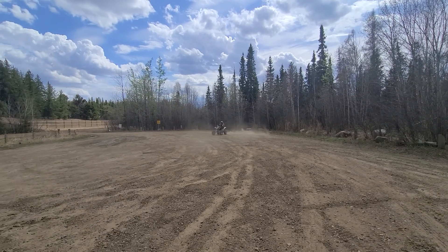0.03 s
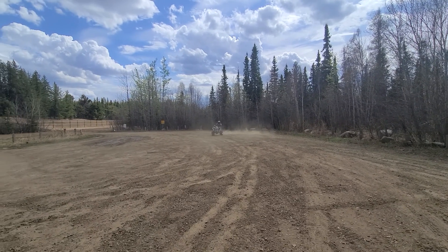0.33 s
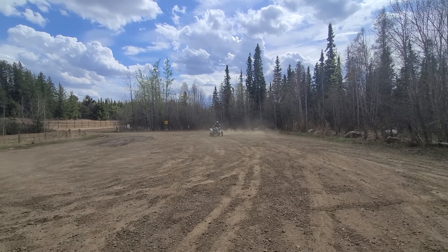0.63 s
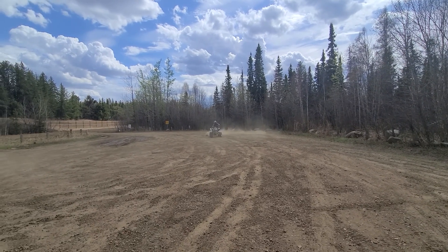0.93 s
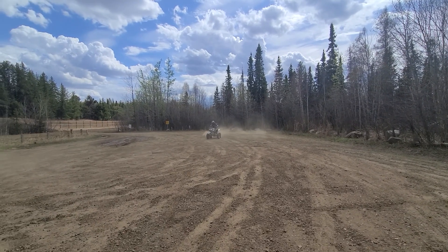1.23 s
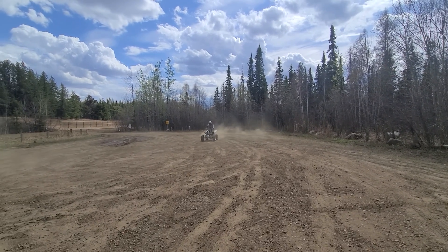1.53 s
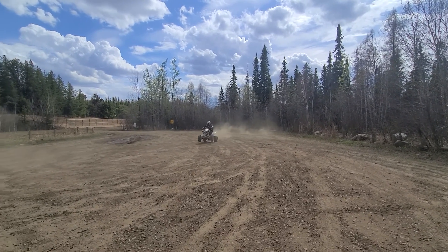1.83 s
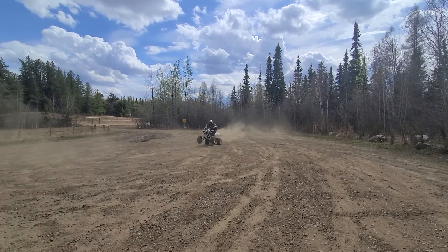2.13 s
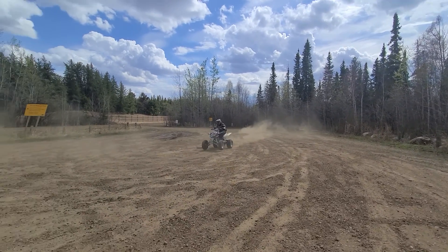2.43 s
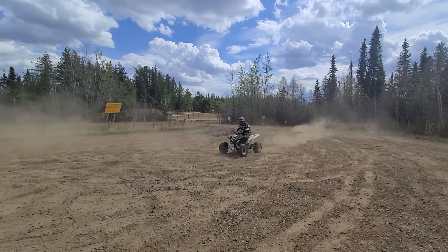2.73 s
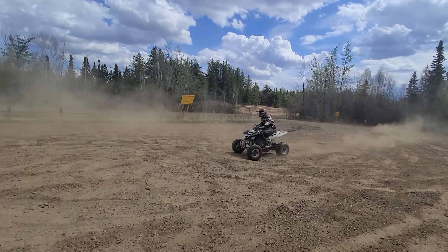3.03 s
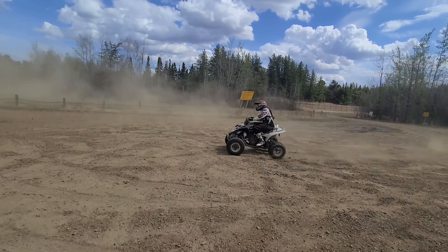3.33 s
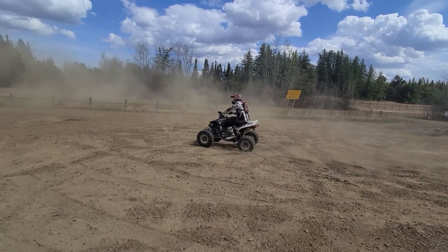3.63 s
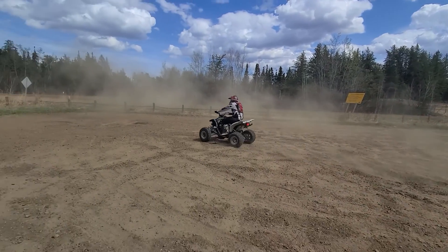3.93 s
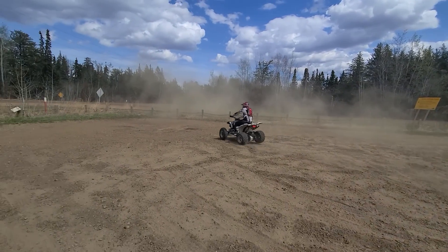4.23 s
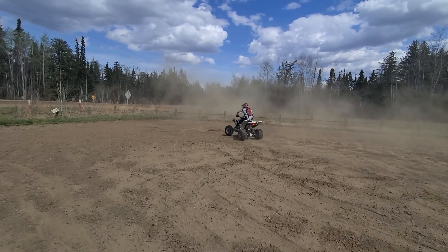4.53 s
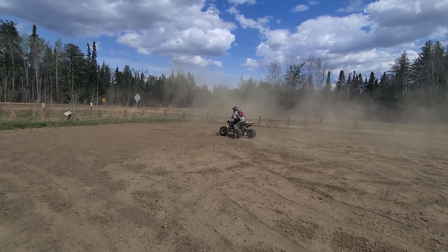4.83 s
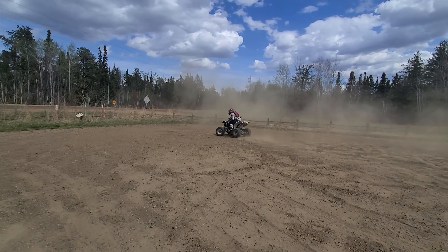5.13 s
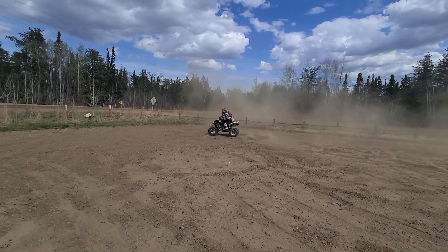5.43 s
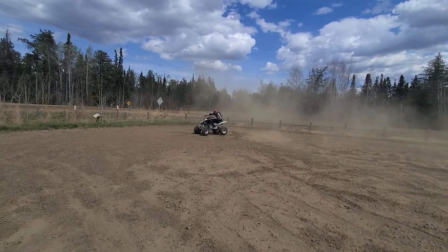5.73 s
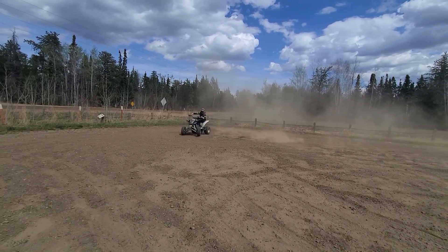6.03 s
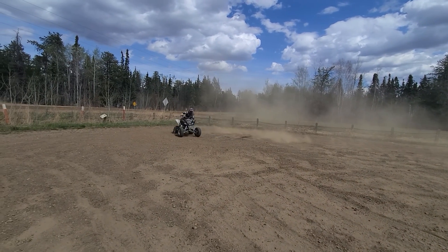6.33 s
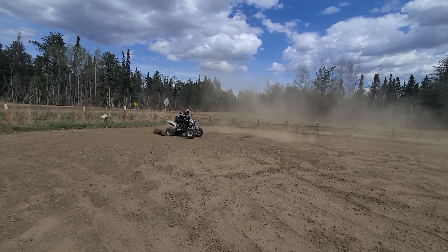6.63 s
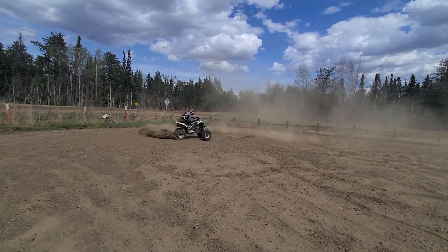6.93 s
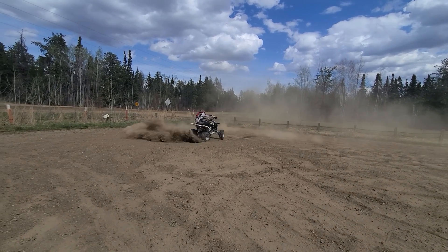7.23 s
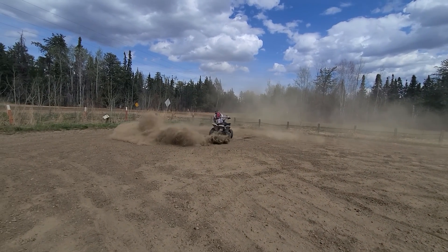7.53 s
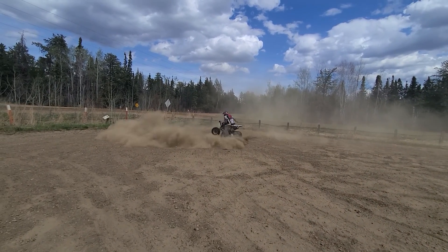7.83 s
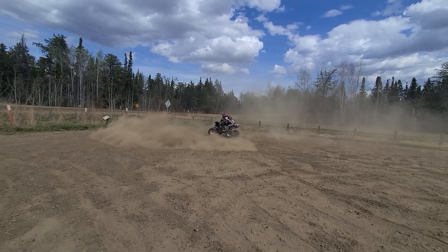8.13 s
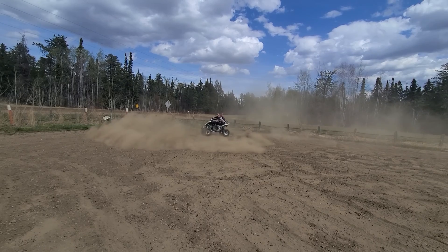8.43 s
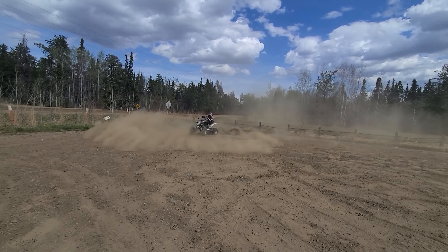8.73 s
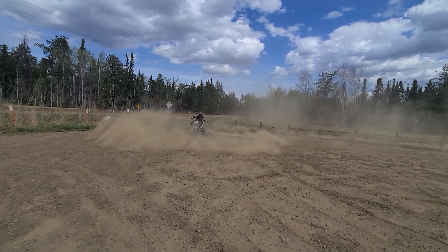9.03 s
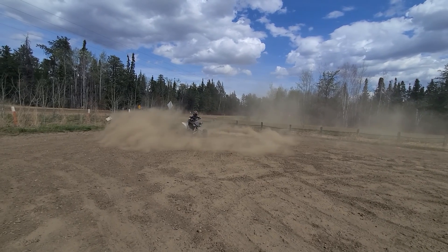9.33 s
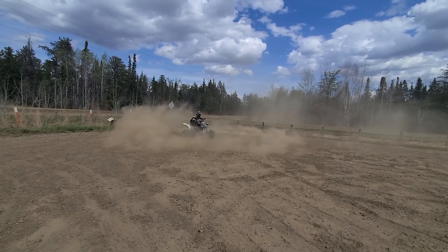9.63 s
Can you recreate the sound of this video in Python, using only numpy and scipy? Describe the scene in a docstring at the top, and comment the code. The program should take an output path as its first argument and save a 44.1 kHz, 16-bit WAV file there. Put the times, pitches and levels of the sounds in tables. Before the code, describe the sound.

Gusts of wind rumble and thud on a microphone with a muffled left side while a quad bike rides over dirt in a forest clearing. The engine gives several short, crackling revs, then sinks to a low putter as it passes with ticking stones, tyre hiss and a thin brake squeal. Rapid throttle blips follow, ending in a longer rising rev, all with a faint, dull echo.

```python
"""On open dirt in a forest, a one-cylinder four-stroke quad bike revs in short bursts (blips),
coasts past at idle and revs again. On throttle each firing thumps, cracks and rasps in the exhaust;
with the throttle shut a later, hollow pulse takes over. Tyres and drive hiss, grit ticks, brakes
squeal faintly and the trees echo. Wind buffets the microphone, whose left side is muffled."""
import sys
import numpy as np
from scipy import signal
from scipy.fft import rfft, irfft
from scipy.io import wavfile
from scipy.ndimage import uniform_filter1d

SR = 44100
rng = np.random.default_rng(int(sys.argv[2]) if len(sys.argv) > 2 else 0)


def store_wav(level_fs):
    """Save 16-bit WAV to argv[1]."""
    pcm = np.round(np.clip(np.atleast_2d(level_fs), -1, 1) * 32767)
    wavfile.write(sys.argv[1], SR, pcm.T.astype(np.int16))


N = 427769
TIME = np.arange(N) / SR
OVERRUN_HZ = 40  # reference firing rate; "overrun" means running on with the throttle shut

# Levels in the tables are relative: the functions add their own gains.
# Tone colours, or how strong each frequency is (f/Hz, level/dB):
WIND_TONE = [(8, -13), (28, -19), (45, -0.5), (90, -7), (200, -18), (600, -69), (4000, -92)]  # wind on the microphone
BUFFET_TONE = [(20, -13), (70, 13), (200, -6), (500, -21), (1200, -47), (4000, -72)]  # a sudden blow of air
MUFFLED_TONE = [(30, -13.5), (65, 1.5), (110, -4.5), (175, -7.5), (260, -8.5), (400, -14.5), (650, -8),
                (1000, -18.5), (1900, -21.5), (3300, -21), (8000, -44.5), (16000, -38)]  # the microphone's left opening
GRIT_TONE = [(500, -15), (1100, 6), (1550, -15), (2700, -6), (6000, -9), (8400, -13), (11000, 0),
             (13500, 3), (16000, -9)]  # stones flung by the tyres
ROLL_TONE = [(500, 4.5), (1100, 9), (1550, -2), (2700, 4), (3900, -0.5), (5200, -2.5), (6000, 1),
             (7300, -5.5), (8400, -17), (10500, -9.5), (12200, -3), (13800, -8.5), (16000, -8.5)]  # tyres and drive
GAS_TONE = [(1200, 1), (2500, 2), (3400, 1), (4600, -1), (6400, 1.5), (7400, -4), (8600, -12.5),
            (10200, -8.5), (11800, -4.5), (13500, -10), (16000, -17.5)]  # gas leaving the pipe
CRACK_TONE = [(350, -15), (570, -10.5), (750, 2.5), (950, -5), (1270, -3), (1550, -20), (2500, -31),
              (5000, -64), (12000, -42)]  # the sharp front of a firing
RING_TONE = [(1000, -40.5), (1600, -12), (1780, 4), (1950, 4.5), (2200, -11), (2700, -10), (4000, -67),
             (12000, -65)]  # the ringing silencer
THUMP_TONE = [(40, -42), (100, -3.5), (170, -3), (290, 3), (410, -1), (540, -13), (750, -31.5),
              (1500, -47.5), (8000, -74.5)]  # a firing on throttle
BARK_TONE = [(150, -28), (330, 2.5), (470, -5), (680, -0.5), (900, -15), (2000, -50), (8000, -80)]  # the hardest firings
HOLLOW_TONE = [(50, -18), (110, 1.5), (160, 5.5), (215, -5), (300, 2), (400, -10.5), (540, -26.5),
               (1000, -35), (8000, -65)]  # the pulse with the throttle shut
IDLE_TONE = [(28, -9), (45, 8), (100, -3), (160, 3), (225, 2), (330, -2), (410, -7.5), (480, -18.5),
             (700, -40), (8000, -57.5)]  # the soft putter at idle

# gusts above the steady breeze (t/s, length/s, rise/dB)
WIND_GUSTS = [(.03, 0.2, 7.9), (1.468, 0.091, 11.3), (3.35, .15, 7.6), (5.8, .45, 5.7), (6.95, 0.42, 8.82),
              (8.1, 0.19, 4.6), (9.1, .2, 3), (9.68, 0.087, 9)]
# blows of air on the left side (t/s, length/s, level/dB)
AIR_BLOWS = [(1.422, 0.0072, -4), (1.512, 0.036, -15), (3.223, 0.03, -23), (5.462, 0.024, -7.5),
             (6.59, 0.017, -5)]
# brake squeals (t/s, length/s, f/Hz, level/dB)
BRAKE_SQUEALS = [(3.179, 0.21, 5930, -39.5), (5.773, 0.031, 5544, -37)]
# notes at which chain and frame ring (f/Hz, width/Hz, level/dB)
FRAME_NOTES = [(726, 230, -11), (1770, 180, 3), (2460, 130, -9), (4730, 150, -19), (5960, 130, -30)]
# how much of the hiss is exhaust gas while the throttle is not shut (t/s, share/0-1)
GAS_IN_HISS = [(0, 0), (.85, 0.77), (1.3, 0.04), (1.8, 0.23), (2.4, 0.06), (3, 0.01), (5.05, 0.23),
               (5.17, 0.54), (6.6, 0.79), (9.7, 0.68)]
# how much of the hiss's top treble survives the distance (t/s, share/0-1)
TREBLE_SHARE = [(0, 0), (1.3, 0), (1.8, 0.69), (3.3, 1), (5.6, 0.99), (6.2, 0.35), (7, 0.98), (8.2, 0.96),
                (8.9, 0.26), (9.7, 0.61)]
# how fully the engine idles (t/s, share/0-1)
IDLE_SHARE = [(3.24, 0), (3.28, 0.97), (4.98, 0.99), (5.13, 0)]
# throttle blips (opens/s, eases/s, firing rate at opening/Hz, at easing/Hz, boom/dB, thump/dB,
# crack/dB, ring/dB, hiss/dB, snapped open/0-1, shut afterwards/0-1, clatter afterwards/dB)
THROTTLE_BLIPS = [(.07, 0.229, 36.2, 44.57, -19, -17.5, -32.5, -43, -39.5, 0.38, 1, 1),
                  (0.346, 0.541, 33.3, 48.38, -17.5, -19.5, -26.5, -35, -37.5, 0.24, 0.92, 3),
                  (0.732, 0.908, 30.97, 45.34, -17, -20, -27, -29.5, -36.5, 0.53, 0.78, 4.5),
                  (1.016, 1.208, 36.64, 45.98, -16.5, -18, -28.5, -34.5, -38, 0.04, 0.95, 4),
                  (1.525, 1.873, 27.2, 59.36, -16, -18, -25.5, -36.5, -37.5, 0.03, 0.86, -1.5),
                  (1.977, 2.42, 47.08, 68.15, -15.5, -18.5, -24, -33, -34, 0, 1, -9),
                  (5.108, 5.302, 40.27, 55.9, -22, -16.5, -28.5, -39, -37.5, 0.05, 0.32, -6.5),
                  (5.576, 5.695, 41.62, 51.08, -17, -18.5, -29.5, -35, -35, 0, 0.88, -0.5),
                  (5.818, 5.919, 38.26, 49.52, -17, -19, -32.5, -30.5, -34, 0.31, 1, -1.5),
                  (6.168, 6.333, 28.72, 43.35, -16.5, -18.5, -31, -42, -35.5, 0.01, 1, 2.5),
                  (6.489, 6.687, 32.64, 47.94, -18, -20.5, -35, -32.5, -30, 0.96, 0.44, -2.5),
                  (6.775, 6.95, 40.77, 52.62, -19, -18.5, -30, -35, -31.5, 0.86, 0.08, -1),
                  (7.008, 7.147, 52.48, 59.63, -21.5, -16, -25.5, -31, -31, 0.31, .35, -8),
                  (7.302, 7.458, 41.6, 48.94, -28, -15, -31.5, -28, -34, 1, 1, -6.5),
                  (7.683, 7.873, 28.81, 45.14, -28, -16, -33, -32, -39, 0.98, 0.09, -8),
                  (8.141, 8.368, 38.84, 49.02, -26, -18.5, -33.5, -35, -39, 0.42, 0.69, -6),
                  (8.51, 8.693, 37.16, 45.15, -21.5, -21, -33, -38.5, -37, 0.07, 0.99, -1.5),
                  (8.886, 9.067, 27.75, 41.48, -17.5, -20, -31, -40, -37, 0, 0.99, 1),
                  (9.294, 9.702, 25.33, 54.2, -17, -22.5, -28, -29.5, -29, 1, 0, 17)]
# a row each for boom, thump, crack, ring and hiss
# (overrun level at OVERRUN_HZ/dB, rise with firing rate/(dB per Hz), swell over a blip/dB)
ENGINE_VOICES = [(-22.5, 0.12, -2), (-20.5, 0.38, -2), (-39, 0.68, 2.5), (-43.5, 0.68, 5), (-43.5, 0.58, 4)]
# firing rate while coasting past (t/s, f/Hz)
COAST_RATE = [(2.42, 63.6), (2.5, 56.2), (2.64, 48.5), (2.95, 45.7), (3.25, 35.6), (3.5, 32.3), (4.3, 31.4),
              (4.9, 32.3), (5.11, 39.5)]
# the five voices while coasting past (t/s, boom/dB, thump/dB, crack/dB, ring/dB, hiss/dB)
COAST_LEVELS = [(2.44, -27, -14.5, -34, -27, -36), (2.57, -23, -16, -36, -34.5, -43),
                (2.83, -32, -14, -32.5, -42, -44), (2.918, -21.5, -17, -37, -38.5, -44),
                (3.27, -16, -22.5, -33, -41.5, -43), (3.65, -15.5, -19, -30.5, -35.5, -42),
                (4.38, -15.5, -18, -35, -43, -48.5), (4.861, -14.5, -17, -34, -43, -48),
                (5.06, -13, -13, -35, -41, -47.5), (5.14, -29, -15, -27, -36.5, -43)]


def undb(db):
    """Turn decibels into a gain."""
    return 10 ** (np.asarray(db) / 20)


def unit(x):
    """Scale a signal to an average strength (rms) of 1."""
    return x / np.sqrt(np.mean(x ** 2))


def curves(table):
    """Each column after the time, as one value per sample."""
    times, *columns = np.transpose(table)
    return [np.interp(TIME, times, column) for column in columns]


def during(start, end):
    """1 inside a span of time, else 0."""
    return 1. * ((TIME >= start) & (TIME < end))


def bump(peak_s, length_s):
    """A smooth rise to 1 and back."""
    return np.exp(-((TIME - peak_s) / length_s) ** 2)


def noise():
    """White noise of strength 1."""
    return rng.standard_normal(N)


def drift(rate_hz):
    """A smooth random wander of strength 1."""
    step = int(SR / rate_hz)
    stairs = np.repeat(rng.standard_normal(N // step + 1), step)[:N]
    return unit(uniform_filter1d(stairs, step))


def response(tone, size=8192):
    """What a single click becomes with this tone colour."""
    hz, db = np.transpose(tone)
    grid_hz = np.maximum(np.fft.rfftfreq(size, 1 / SR), 1)
    gains = undb(np.interp(np.log(grid_hz), np.log(hz), db))
    cepstrum = irfft(np.log(gains))
    cepstrum[1:size // 2] *= 2  # folded forward, so nothing sounds before the click
    cepstrum[size // 2 + 1:] = 0
    return irfft(np.exp(rfft(cepstrum)))


def colour(x, tone):
    """Give x a tone colour; white noise keeps its power."""
    click = response(tone)
    return signal.fftconvolve(x, click / np.linalg.norm(click))[:N]


def resonate(x, hz, width_hz):
    """Let x ring at one note, with gain 1 at its centre."""
    return signal.lfilter(*signal.iirpeak(hz, hz / width_hz, fs=SR), x)


def wind(breeze_db=-48):
    """Gusty air rumbles on one side of the microphone."""
    flutter_db = 2.5 * drift(12)
    gusts_db = sum(db * bump(t, length) for t, length, db in WIND_GUSTS)
    return colour(noise() * undb(breeze_db + gusts_db + flutter_db), WIND_TONE)


def buffets():
    """Short, dull blows of air hit the microphone."""
    swell = sum(undb(db) * bump(t, length) for t, length, db in AIR_BLOWS)
    return colour(noise() * swell, BUFFET_TONE)


def forest(x, fade_s=1.0, build_s=0.026, echo_db=-9):
    """The trees scatter a faint, dull echo."""
    tail = (noise() * undb(-60 * TIME / fade_s) * (1 - np.exp(-TIME / build_s)))[:SR]
    echo = signal.fftconvolve(x, tail / np.linalg.norm(tail))[:N]
    band = signal.butter(1, [120, 3000], "band", fs=SR, output="sos")
    return undb(echo_db) * signal.sosfilt(band, echo)


def grit(closest_s=3.5, length_s=0.76, per_s=900, scatter_db=4, level_db=-42):
    """Small stones tick against the frame while the bike is near."""
    ticks = (rng.random(N) < per_s / SR) * undb(scatter_db * noise())
    return colour(unit(ticks), GRIT_TONE) * undb(level_db) * bump(closest_s, length_s)


def brakes(width_hz=260):
    """The brakes give thin, unsteady squeals."""
    out = np.zeros(N)
    for t, length, hz, db in BRAKE_SQUEALS:
        squeal = resonate(resonate(noise(), hz, width_hz), hz, width_hz)
        out += unit(squeal) * undb(db) * bump(t, length)
    return out


def latest_blip():
    """The columns of the latest blip, one value per sample."""
    columns = np.transpose(THROTTLE_BLIPS)
    return columns[:, np.maximum(np.searchsorted(columns[0], TIME) - 1, 0)]


def pulling(blip, pickup_s=.024, shut_lag_s=.01):
    """1 while the engine pulls, else 0; it picks up late from low revs, at once if snapped open."""
    opens, eases, opening_hz, *_, snap, _, _ = blip
    late_s = pickup_s * (1 - snap) * (OVERRUN_HZ / opening_hz) ** 2
    return during(opens + late_s, eases + shut_lag_s)


def throttle_shut(blip):
    """0 while pulling or idling, up to 1 on the overrun."""
    *_, depth, _ = blip
    idling = during(IDLE_SHARE[1][0], IDLE_SHARE[-1][0])
    overrun = depth * (1 - pulling(blip)) * (1 - idling)
    return np.clip(uniform_filter1d(overrun, size=400), 0, 1)


def firing_rate(rev_s=.3, flywheel_s=.041):
    """Firings per second: they climb on throttle and sag after; the flywheel smooths the changes."""
    blips = np.array(THROTTLE_BLIPS)
    turn_s, turn_hz = blips[:, :2].ravel(), blips[:, 2:4].ravel()
    leg = np.clip(np.searchsorted(turn_s, TIME) - 1, 0, len(turn_s) - 2)  # which climb or sag
    age_s = np.maximum(TIME - turn_s[leg], 0)
    progress = np.expm1(-age_s / rev_s) / np.expm1(-np.diff(turn_s) / rev_s)[leg]
    hz = turn_hz[leg] + np.diff(turn_hz)[leg] * progress
    coasting = during(COAST_RATE[0][0], COAST_RATE[-1][0])
    hz = np.where(coasting, curves(COAST_RATE)[0], hz)
    return uniform_filter1d(hz, int(flywheel_s * SR), mode="nearest")


def follow(db, rise_s=.02, fall_s=.022):
    """Let a level rise quickly and fall more slowly."""
    rising = uniform_filter1d(db, int(rise_s * SR))
    hold = np.exp(-1 / (fall_s * SR))
    falling = db[0] + signal.lfilter([1 - hold], [1, -hold], rising - db[0])
    return np.maximum(rising, falling)


def voice_levels(blip, hz):
    """Boom, thump, crack, ring and hiss in dB: a blip brightens as it goes, then sinks with the revs."""
    opens, eases, _, _, *blip_db, snap, _, clatter_db = blip
    progress = np.clip((TIME - opens) / (eases - opens), 0, 1)
    swell = (np.sqrt(progress) - .75) * (1 - 0.56 * snap)
    on_throttle = pulling(blip)
    coasting = during(COAST_LEVELS[0][0], COAST_LEVELS[-1][0])
    coast_db = curves(COAST_LEVELS)
    loose_db = [0, 0, clatter_db, clatter_db, clatter_db]
    levels = []
    for i, (overrun_db, db_per_hz, swell_db) in enumerate(ENGINE_VOICES):
        open_db = blip_db[i] + swell_db * swell
        shut_db = overrun_db + db_per_hz * (hz - OVERRUN_HZ) + loose_db[i]
        db = np.where(on_throttle, open_db, shut_db)
        levels.append(follow(np.where(coasting, coast_db[i], db)))
    return levels


def pulses(cycle, hz, scatter_db):
    """One click per engine cycle, each of its own strength."""
    at = np.flatnonzero(np.diff(np.floor(cycle)) > 0)
    out = np.zeros(N)
    out[at] = np.sqrt(SR / hz[at]) * undb(scatter_db * rng.standard_normal(len(at)))
    return out


def puffs(cycle, hz, peak_s, rise_s, fall_s, scatter_db):
    """Swirling gas: noise that peaks just after each firing and dies away."""
    turn = cycle - peak_s * hz + 1 / np.pi
    age_s = (turn % 1 - 1 / np.pi) / hz  # negative before the peak
    firing = np.floor(turn - np.floor(turn.min())).astype(int)
    strength = undb(scatter_db * rng.standard_normal(firing.max() + 1))[firing]
    shape = np.exp(np.minimum(age_s / rise_s, -age_s / fall_s))
    return unit(noise() * strength * shape / np.sqrt(hz))


def hiss(cycle, hz, hiss_db, shut):
    """Gas tears out of the pipe once a cycle, over hissing tyres and the ringing chain and frame."""
    share = np.clip(curves(GAS_IN_HISS)[0], 0, 1) * (1 - 0.71 * shut)
    gas = puffs(cycle, hz, peak_s=0.0027, rise_s=0.00074, fall_s=0.0055, scatter_db=1.5)
    rolling = noise() * undb(0.92 * drift(250)) * np.sqrt(1 - share)
    frame = sum(undb(0.83 * db) * resonate(rolling, f, width) for f, width, db in FRAME_NOTES)
    out = colour(gas * np.sqrt(share) * undb(hiss_db + 10), GAS_TONE)
    out += colour(rolling * undb(hiss_db + 9.5), ROLL_TONE)
    out += unit(frame) * undb(hiss_db - 3)
    dull = signal.sosfilt(signal.butter(1, 3500, fs=SR, output="sos"), out)
    return dull + curves(TREBLE_SHARE)[0] * (out - dull)


def snaps(cycle, hz, blip, thump_db, hiss_db, first_lead=0.3268, last_lead=0.082):
    """With the throttle snapped open, a smaller pulse and a spit of gas run ahead of each firing."""
    opens, eases, *_, snap, _, _ = blip
    progress = np.clip((TIME - opens) / (eases - opens), 0, 1)
    early = cycle + first_lead + (last_lead - first_lead) * progress  # the gap closes as revs climb
    snapped = snap * pulling(blip)
    thumps = pulses(early, hz, scatter_db=1) * snapped * undb(thump_db - 10)
    spits = puffs(early, hz, peak_s=0.0025, rise_s=0.00069, fall_s=0.0015, scatter_db=0.5) * snapped
    low = colour(thumps, THUMP_TONE) + 1.3 * colour(thumps, BARK_TONE)
    return low + colour(spits * undb(hiss_db + 1), GAS_TONE)


def crackle(cycle, hz, crack_db, ring_db, power, shut):
    """The front of a firing cracks and rings the silencer; off throttle, loose clatter is left."""
    front = pulses(cycle - .012, hz, scatter_db=5.5) * power
    blast = puffs(cycle, hz, peak_s=0.0016, rise_s=0.00044, fall_s=0.0033, scatter_db=-0.5) * power
    knock = puffs(cycle - .17, hz, peak_s=0.00072, rise_s=0.0026, fall_s=0.0023, scatter_db=3) * shut
    clatter = noise() * (1 - 0.62 * power)
    crack = (0.41 * front + 0.66 * blast + 0.61 * knock + 0.7 * clatter) * undb(crack_db + 4.5)
    ring = (0.65 * front + 0.88 * blast + 0.38 * knock + 0.69 * clatter) * undb(ring_db + 4.5)
    return colour(crack, CRACK_TONE) + colour(ring, RING_TONE)


def boom(cycle, hz, boom_db, lag_s=0.0037, pipe_hz=64):
    """Air sloshes in the pipe twice per firing; the firing rate booms too near the pipe's own note."""
    angle = 2 * np.pi * (cycle - 0.23 - lag_s * hz)
    lowest = np.minimum(hz / pipe_hz, 1) ** 3.3
    slosh = np.cos(2 * angle) + lowest * np.cos(angle) + undb(-14) * np.cos(3 * angle)
    return unit(slosh / np.sqrt(1 + lowest ** 2)) * undb(boom_db + 1.5)


def exhaust(cycle, hz, thump_db, power, shut, idle):
    """Pulses in the pipe: hard thumps on throttle, hollow ones on the overrun, soft pairs at idle."""
    fired = pulses(cycle, hz, scatter_db=1.5) * undb(thump_db)
    late = pulses(cycle - .17, hz, scatter_db=1.5) * undb(thump_db)
    thumps = colour(fired * power * undb(4), THUMP_TONE)
    hollow = colour(late * shut * undb(5.5), HOLLOW_TONE)
    putter = colour((fired + 0.67 * late) * idle * undb(3), IDLE_TONE)
    bark_db = np.minimum(0.61 * (thump_db + 15), 2) - 10.5  # strong pulses steepen in the pipe
    return thumps + hollow + putter + colour(fired * power * undb(bark_db), BARK_TONE)


def quad_bike():
    """The engine's cycle sets the beat for the bike's voices."""
    blip, hz = latest_blip(), firing_rate()
    boom_db, thump_db, crack_db, ring_db, hiss_db = voice_levels(blip, hz)
    cycle = np.cumsum(hz) / SR - .43 + 0.005 * drift(30)  # counts firings, a little unevenly
    idle = np.clip(curves(IDLE_SHARE)[0], 0, 1)
    shut = throttle_shut(blip) * (1 - idle)
    power = 1 - idle - shut
    return (exhaust(cycle, hz, thump_db, power, shut, idle)
            + boom(cycle, hz, boom_db)
            + crackle(cycle, hz, crack_db, ring_db, power, shut)
            + hiss(cycle, hz, hiss_db, shut)
            + snaps(cycle, hz, blip, thump_db, hiss_db))


def scene():
    """The right side hears the bike clearly; the left is muffled and takes most of the wind."""
    bike = quad_bike() + brakes() + grit()
    left = signal.fftconvolve(bike + forest(bike), response(MUFFLED_TONE))[:N]
    right = bike + forest(bike)
    return np.array([left + undb(21.5) * wind() + buffets(), right + undb(14) * wind()])


def record(dry, ceiling=1.02, top_hz=16000):
    """Round off the tallest pulses and cut the highest treble."""
    rounded = dry / (1 + (dry / ceiling) ** 6) ** (1 / 6)
    return signal.sosfilt(signal.ellip(10, .1, 80, top_hz, fs=SR, output="sos"), rounded)


dry = scene()
out = record(dry)
store_wav(out)
```